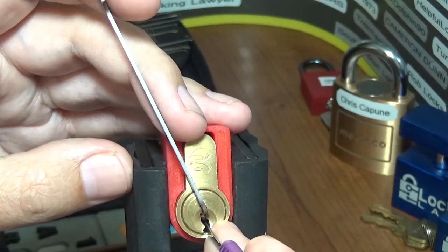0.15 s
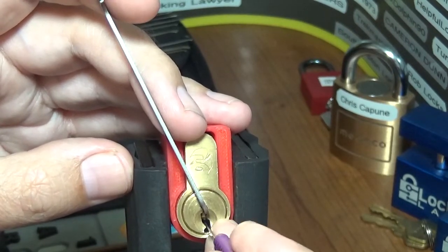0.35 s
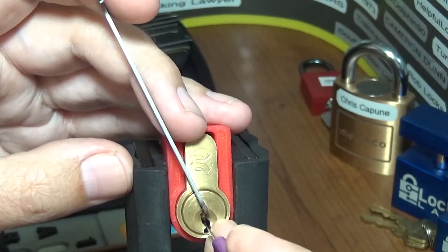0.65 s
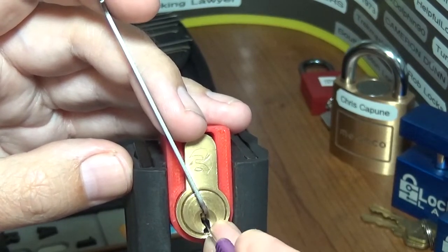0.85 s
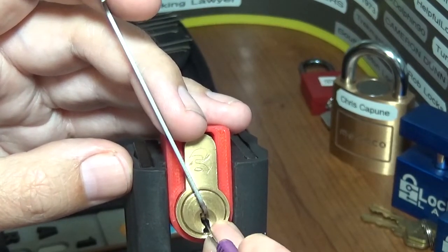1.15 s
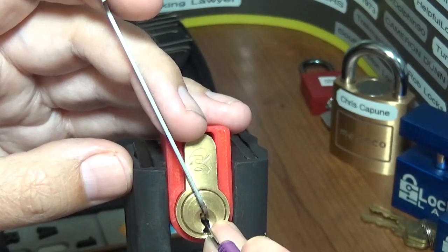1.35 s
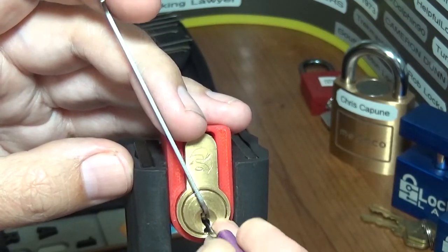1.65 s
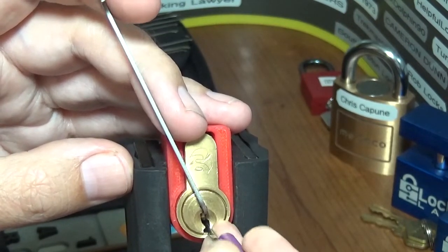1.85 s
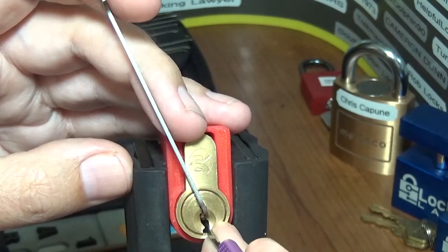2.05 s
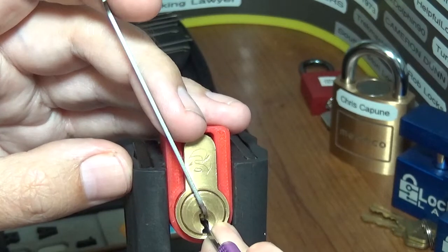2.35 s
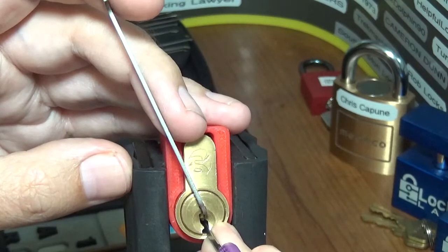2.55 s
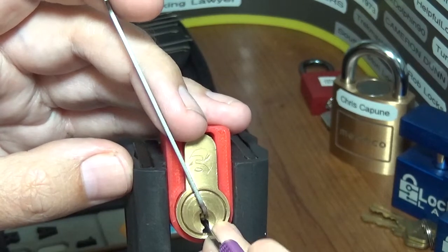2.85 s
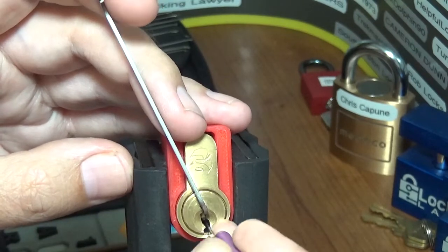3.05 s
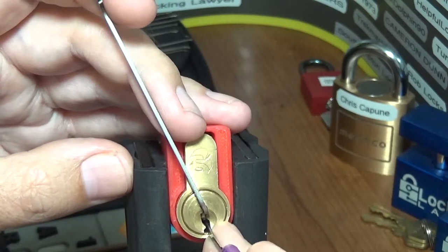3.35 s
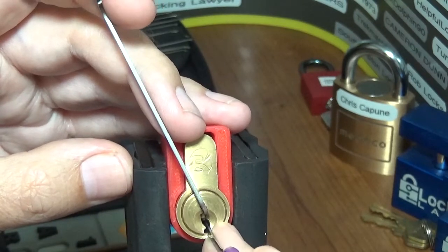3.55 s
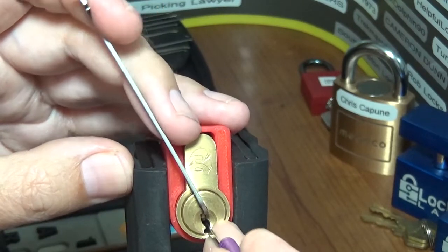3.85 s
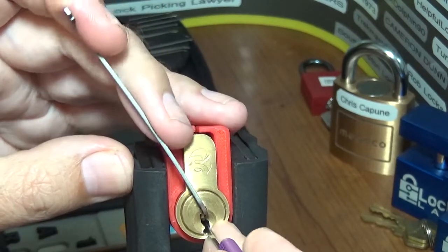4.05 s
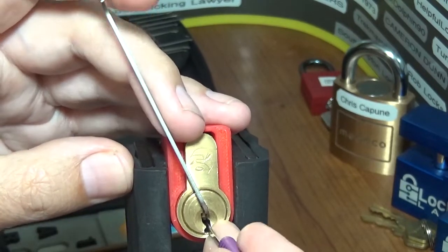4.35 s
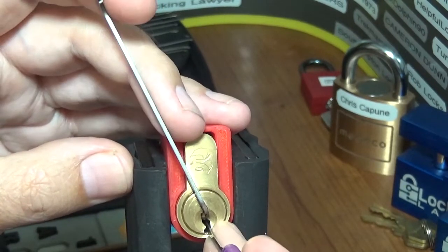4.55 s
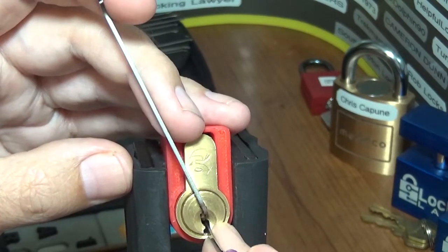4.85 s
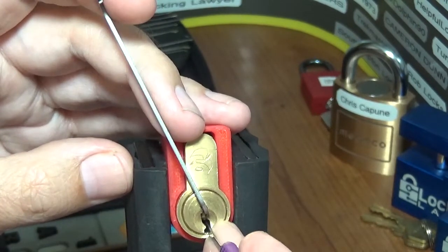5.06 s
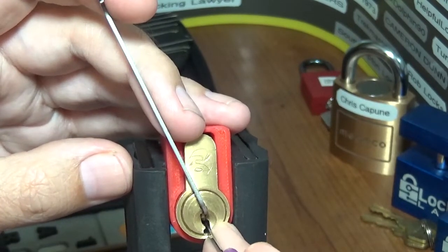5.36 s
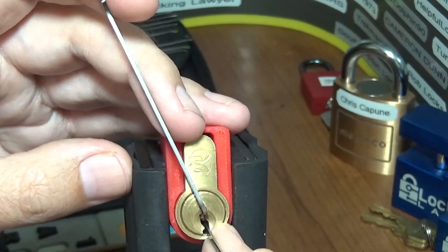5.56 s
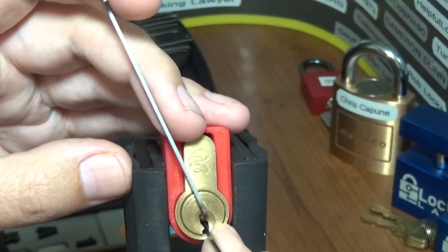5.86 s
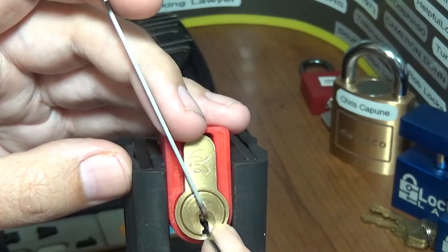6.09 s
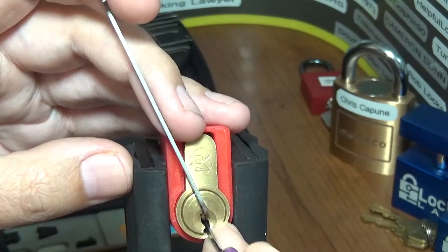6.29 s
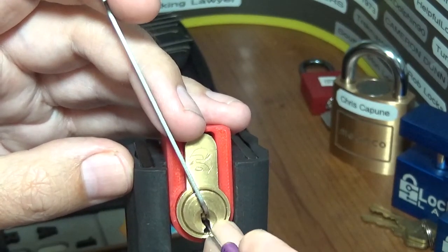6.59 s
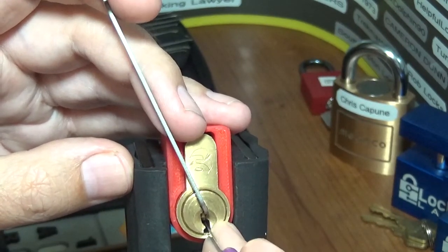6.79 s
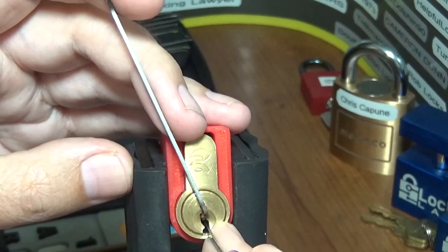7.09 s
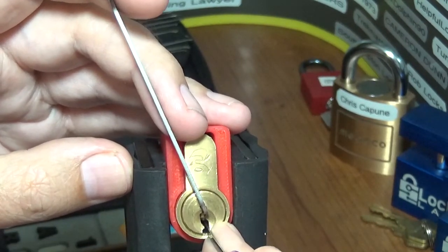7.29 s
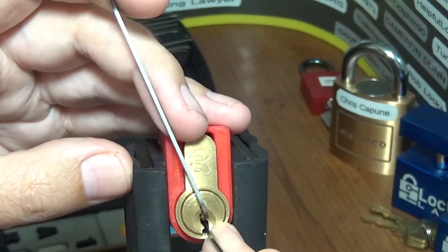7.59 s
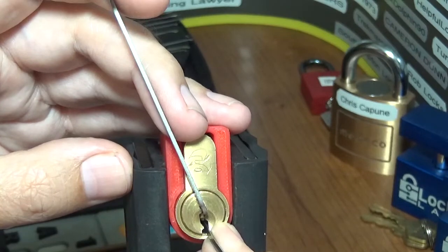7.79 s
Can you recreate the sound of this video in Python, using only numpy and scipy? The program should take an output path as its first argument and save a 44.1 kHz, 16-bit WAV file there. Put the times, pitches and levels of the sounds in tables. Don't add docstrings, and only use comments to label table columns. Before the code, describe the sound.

Close-up lock picking: faint pin clicks and tiny scrapes, occasional hard snapping cracks, the later ones with a thin metal ring, over steady mains hum.

```python
import sys
import numpy as np
from scipy import signal
from scipy.fft import rfft, irfft, next_fast_len
from scipy.io import wavfile
from scipy.ndimage import uniform_filter1d

SR = 44100
rng = np.random.default_rng(int(sys.argv[2]) if len(sys.argv) > 2 else 0)


def dump_mix(stems):
    frames = np.atleast_2d(stems).T
    limited = np.clip(frames, -1, 1)
    pcm = np.round(limited * 32767).astype(np.int16)
    wavfile.write(sys.argv[1], SR, pcm)


def boost(x):
    u = np.asarray(x, float) / 20
    return 10 ** u


N = 349713


def unit(x):
    return x / np.sqrt(np.mean(x ** 2) + 1e-20)


def along(points, hz):
    point_hz, value = np.transpose(points)
    return np.interp(np.log(hz + 1), np.log(point_hz + 1), value)


def filtered(x, points):
    n = x.shape[-1]
    size = next_fast_len(n + 4096)
    gain = boost(along(points, np.fft.rfftfreq(size, 1 / SR)))
    return irfft(rfft(x, size) * gain, size)[..., :n]


def add(track, time_s, hit):
    part = track[round(time_s * SR):][:len(hit)]
    part += hit[:len(part)]


def patchy_hiss():
    # (frequency [Hz], density [dB per Hz])
    hiss_colour = [(30, -1), (120, -6), (400, -0.5), (2000, 0.5), (6000, 0.5), (11000, -0.5)]
    open_share = 0.45
    z = signal.stft(rng.standard_normal(N), nperseg=2048)[2]
    field = np.repeat(rng.standard_normal((129, z.shape[1])), 8, axis=0)[:len(z)]
    gate = field < np.quantile(field, open_share)
    noise = signal.istft(z * gate, nperseg=2048)[1][:N]
    return unit(filtered(noise, hiss_colour))


def floor():
    # (frequency [Hz], density [dB per Hz])
    air_colour = [(30, -15), (110, -11.5), (270, -16.5), (700, -24), (2400, -33), (5000, -32.5),
                  (7200, -36), (10700, -39.5)]
    air_db = -50.5
    z = signal.stft(rng.standard_normal(N), nperseg=512)[2]
    field = uniform_filter1d(rng.standard_normal(z.shape), 12, 0)
    field = uniform_filter1d(field, 30, 1)
    noise = signal.istft(z * boost(0.99 * unit(field)), nperseg=512)[1][:N]
    return boost(air_db) * unit(filtered(noise, air_colour))


def hum():
    # (frequency [Hz], rms level [dB], phase [rad])
    mains = (60.015, -48.6, -.58)
    hz, rms_db, phase_rad = mains
    t = np.arange(N) / SR
    return boost(rms_db) * np.sqrt(2) * np.sin(2 * np.pi * hz * t + phase_rad)


def roomed(hit):
    # (frequency [Hz], t60 [s])
    room_t60 = [(300, 0.13), (1800, 0.15), (4000, 0.11), (8000, 0.14), (11000, 0.15)]
    # (frequency [Hz], level [dB])
    room_share = [(300, -7), (1800, -9.5), (4000, -2), (8000, -11.5), (11000, -13)]
    hz, t, z = signal.stft(rng.standard_normal(SR // 5), SR, nperseg=128)
    onset = 1 - np.exp(-t / 0.0018)
    fade = boost(-60 * t / along(room_t60, hz)[:, None]) * onset
    share = boost(along(room_share, hz))[:, None] / np.linalg.norm(fade, axis=1, keepdims=True)
    tail = signal.istft(z * fade * share, SR, nperseg=128)[1] / 8
    return signal.fftconvolve(hit, np.concatenate([[1], tail]))


def struck(modes, t60_s, scatter_db, size, extra_db=0):
    t, f = np.arange(size) / SR, np.fft.rfftfreq(size, 1 / SR)
    impact = boost(12.5) * (t == 0)
    force = rfft(rng.standard_normal(size) * boost(-60 * t / t60_s) + impact)
    force = force / np.abs(force) ** 0.75
    hz, width_hz, db = np.transpose(modes)[:, :, None]
    db = db + np.reshape(extra_db, (-1, 1)) + scatter_db * rng.standard_normal(hz.shape)
    sign = (-1.) ** np.arange(len(hz))[:, None]
    resonance = 1j * f * width_hz / (hz * hz - f * f + 1j * f * width_hz)
    response = np.sum(boost(db) * sign * resonance, 0)
    hit = irfft(force * response, size)[:size // 2]
    return hit / np.abs(hit).max()


def handle():
    # (frequency [Hz], width [Hz], level [dB])
    handle_modes = [(1745, 14, 2.5), (1840, 60, 4)]
    # (time [s], level [dB])
    shakes = [
        (5.022, -56),
        (5.9466, -24),
        (7.4465, -33),
    ]
    track = np.zeros(N)
    for time_s, db in shakes:
        add(track, time_s, boost(db) * struck(handle_modes, 0.004, scatter_db=0, size=32768))
    return track


def knocks():
    # (frequency [Hz], width [Hz], level [dB])
    plug_modes = [(2490, 143, -0.5), (3260, 300, -1), (3646, 226, 2), (4630, 1800, -0.5), (5520, 1340, -2)]
    wrench_modes = [(1150, 460, -13.5), (1463, 157, -5.5), (1788, 74, 1), (1931, 81, 1), (2130, 710, -10.5)]
    vise_modes = [(385, 50, -2), (548, 34, 9.5), (881, 123, -7), (1030, 260, -4)]
    # (time [s], plug [dB], wrench [dB], vise [dB])
    taps = [(0.2636, -39.5, -40, -41.5), (0.27, -54, -49, -42), (0.296, -42.5, -43.5, -55),
            (1.2498, -47, -42.5, -49.5), (1.5803, -56, -50, -37.5), (1.583, -49, -56, -43),
            (1.588, -47, -48, -47), (1.6038, -48, -46, -59), (1.9301, -42.5, -39.5, -39.5),
            (2.0535, -48, -73, -59), (2.925, -66, -66, -50), (2.963, -57, -53, -56),
            (2.9751, -52, -50, -49), (3.0503, -40.5, -49, -53), (3.235, -45, -50, -53),
            (3.2654, -46, -54, -52), (3.3302, -47, -54, -44), (3.343, -57, -58, -44),
            (3.8001, -51, -50, -47), (3.9926, -57, -49.5, -59), (4.37, -66, -55, -64),
            (4.4703, -48, -53, -69), (4.4851, -48, -65, -61), (4.4976, -52, -49, -50),
            (4.9808, -71, -53, -44.5), (5.004, -43, -52, -65), (6.5332, -45, -53, -52),
            (6.693, -52, -55, -59), (7.307, -55, -56, -62), (7.4641, -57, -58, -55)]
    # (time [s], plug [dB], wrench [dB], vise [dB], jaw ring [dB])
    plug_jumps = [
        (2.0108, -42, -40, -31, -6),
        (2.0129, -26.5, -36, -38, -6),
        (3.297, -32, -48, -34, -9),
        (3.3032, -38, -36, -37, 1),
        (5.0218, -35, -32, -43, -10),
        (5.9462, -20.5, -31, -33.5, -21),
        (5.9474, -23.5, -27, -47, -19),
        (7.4453, -26, -32, -52, 8),
        (7.448, -33, -37, -33, -6),
    ]
    # (time [s], level [dB], frequency [Hz], t60 [s])
    bench_thump = (2.011, -42, 130, 0.1)
    hard_db, hard_per_db = -4, 0.45
    tap_hard_db, tap_jaw_db = -12, 2.5
    upper = np.array(plug_modes)[:, 0] > 4300
    jaw = np.arange(len(vise_modes)) == 1

    blows = [(*row, hard_db + hard_per_db * (row[1] - row[2])) for row in plug_jumps]
    blows += [(*row, tap_jaw_db, tap_hard_db) for row in taps]
    track = np.zeros(N)
    for time_s, plug_db, wrench_db, vise_db, jaw_db, upper_db in blows:
        plug = struck(plug_modes, 0.023, scatter_db=1.5, size=8192, extra_db=upper_db * upper)
        wrench = struck(wrench_modes, 0.026, scatter_db=2.0, size=8192)
        vise = struck(vise_modes, 0.014, scatter_db=2.5, size=8192, extra_db=jaw_db * jaw)
        hit = boost(plug_db + 4.5) * plug + boost(wrench_db + 4.5) * wrench + boost(vise_db + 5.0) * vise
        add(track, time_s, roomed(hit))

    time_s, db, hz, t60_s = bench_thump
    t = np.arange(SR // 10) / SR
    add(track, time_s, boost(db - 60 * t / t60_s) * np.sin(2 * np.pi * hz * t))
    return track


def contacts():
    # (time [s], level [dB], snap centre [Hz])
    touches = [(0.263, -54, 6800), (0.296, -44, 10100), (0.2994, -28.5, 9600), (1.2506, -36.5, 8400),
               (1.5961, -25.5, 11500), (1.931, -50, 7200), (2.0418, -35, 9100), (3.0511, -24.5, 9300),
               (3.078, -42, 8000), (3.252, -33, 10000), (3.2655, -34, 10000), (3.3303, -22.5, 9800),
               (3.3398, -32, 10000), (3.8018, -33, 8200), (3.9926, -43.5, 7400), (4.2166, -49, 7340),
               (4.4491, -45, 9450), (4.467, -37.5, 8240), (4.497, -35, 9400), (5.0031, -27, 10900),
               (5.0222, -37, 9400), (5.236, -41.5, 7850), (5.978, -29, 9800), (6.384, -51, 10000),
               (6.4074, -48, 8600), (6.503, -54, 10000), (6.5335, -32, 10300), (6.5462, -43, 10000),
               (6.6936, -36.5, 8400)]
    # (time [s], level [dB], snap centre [Hz])
    cracks = [(2.0103, -25, 10500), (2.0129, -10.5, 10300), (2.0166, -18, 10400), (3.2985, -27, 10300),
              (3.303, -16, 9000), (3.3094, -22, 9600), (5.9465, -8, 10700), (5.9482, -19, 7800),
              (5.95, -26, 6960), (7.4455, -15, 9000), (7.4492, -16, 8200)]
    # (start [s], length [s], level [dB], change to the end [dB])
    scrapes = [
        (1.6036, .006, -42, -10),
        (3.1157, .007, -47.5, 4),
        (3.2356, .005, -41, -5),
        (3.246, 0.0036, -43, -5),
        (3.314, .008, -35, -3),
        (4.4637, .009, -47, 1),
        (4.4847, .009, -51, -6),
        (5.2165, 0.013, -48, -3),
        (7.4516, 0.017, -26, -14),
        (7.47, 0.037, -41, -7),
    ]
    skid_hz, pitch_spread, level_scatter_db = 9500, 0.065, 0
    rebound_s, touch_rebound_db, crack_rebound_db = 0.002, -9.5, -12.5

    first = np.array(touches + cracks)
    luck = rng.random((len(first), 2))
    again = first.copy()
    again[:, 0] += rebound_s * (0.5 + luck[:, 0])
    again[:, 1] += [touch_rebound_db] * len(touches) + [crack_rebound_db] * len(cracks)
    again[:, 2] *= 1 + pitch_spread * (2 * luck[:, 1] - 1)

    skids = []
    way = np.linspace(0, 1, 4)
    for start_s, length_s, db, change_db in scrapes:
        time_luck, level_luck, pitch_luck = rng.standard_normal((3, 4))
        time_s = start_s + length_s * (way + 0.065 * time_luck * (way > 0))
        level_db = db + change_db * way + level_scatter_db * level_luck
        skids += zip(time_s, level_db, skid_hz * (1 + pitch_spread * pitch_luck))
    return np.vstack([first, again, skids])


def pins():
    # (frequency [Hz], width [Hz], level [dB])
    cylinder_modes = [(6920, 120, 8), (8400, 270, -26), (9800, 580, 3), (10300, 340, 8.5), (11170, 200, 26)]
    rattle_s, doubling_db = 0.013, 43
    track = np.zeros(N)
    for time_s, db, hz in contacts():
        t60_s = rattle_s * 2 ** ((db + 16.5) / doubling_db)
        snap_modes = [(0.82 * hz, 0.33 * hz, -6), (1.058 * hz, 0.3 * hz, 0)]
        snap = struck(snap_modes, t60_s, scatter_db=0.5, size=2048)
        brass = boost(-6) * struck(cylinder_modes, 1.9 * t60_s, scatter_db=4.5, size=2048)
        add(track, time_s, boost(db + 8.5) * roomed(snap + brass))
    return filtered(track, [(3000, -5), (5000, 2.5), (7000, -2.0)])


def scene():
    mono = pins() + knocks() + handle() + hum() + floor()
    return np.tile(mono, (2, 1))


def roll_off(x):
    return signal.sosfilt(signal.butter(12, 12410, fs=SR, output="sos"), x)


def record(dry):
    # (frequency [Hz], gain [dB])
    band_limit = [(10900, -0.5), (11100, -11.5), (11250, -31), (11500, -32.5), (12400, -47), (16000, -78)]
    hiss = boost(-69.5) * patchy_hiss()
    mix = filtered(dry + [hiss, -hiss], band_limit)
    return roll_off(mix)


dry = scene()
out = record(dry)
dump_mix(out)
```